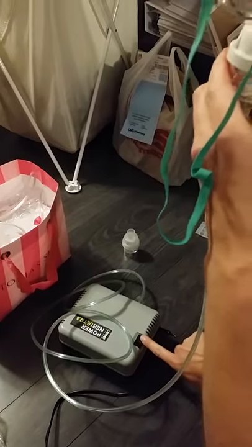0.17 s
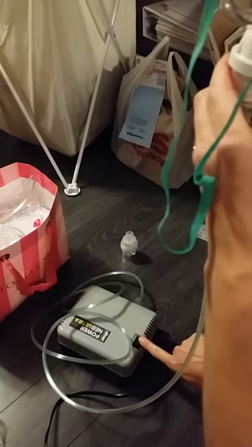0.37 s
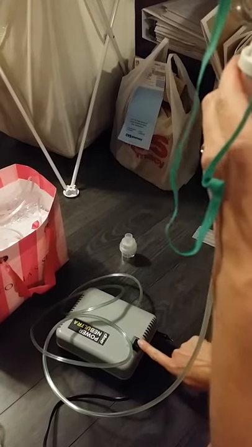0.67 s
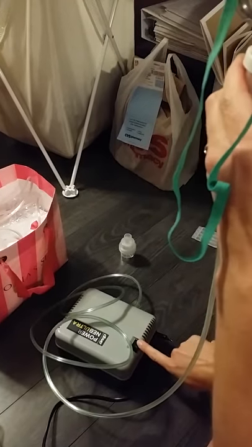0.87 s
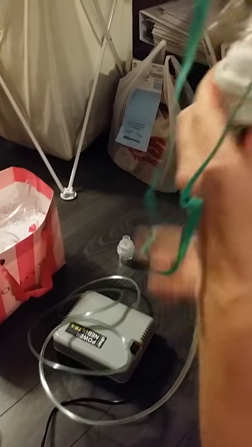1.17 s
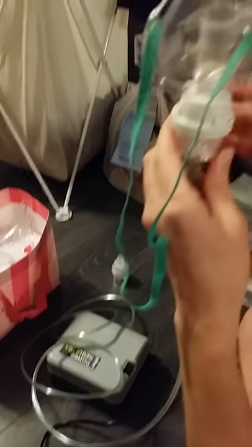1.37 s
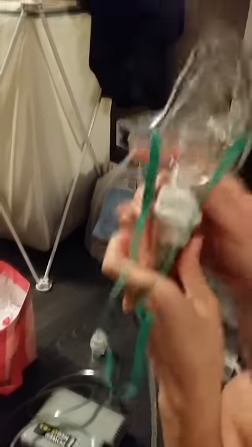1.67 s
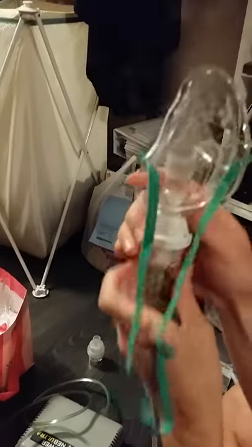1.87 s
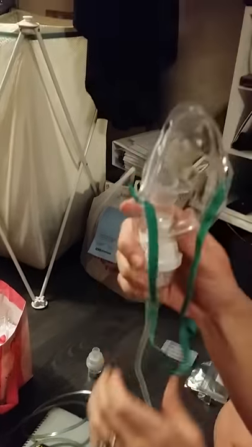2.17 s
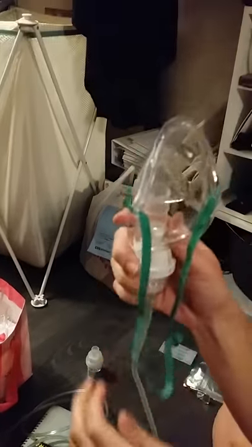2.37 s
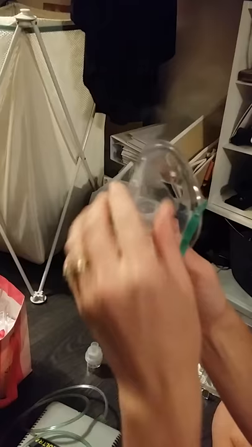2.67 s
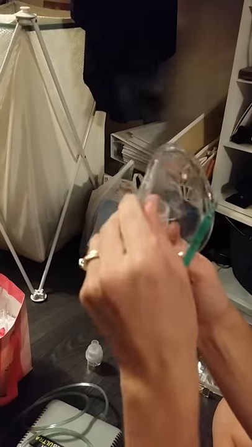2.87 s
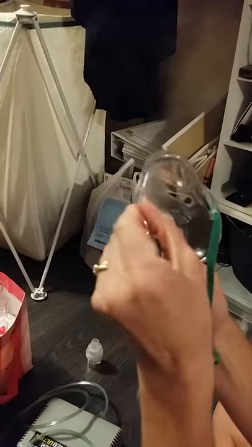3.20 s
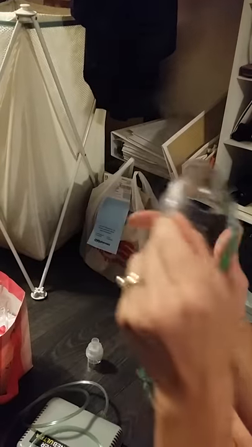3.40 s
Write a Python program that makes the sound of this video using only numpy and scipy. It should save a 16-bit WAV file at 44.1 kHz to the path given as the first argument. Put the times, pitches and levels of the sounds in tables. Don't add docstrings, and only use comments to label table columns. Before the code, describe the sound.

A small air compressor clicks on and buzzes steadily while its air jet hisses through a plastic mask.

```python
import sys
import numpy as np
from scipy import signal
from scipy.fft import rfft, irfft, next_fast_len
from scipy.io import wavfile
from scipy.ndimage import uniform_filter1d, map_coordinates

SR = 44100
rng = np.random.default_rng(int(sys.argv[2]) if len(sys.argv) > 2 else 0)


def volts_from_decibels(level):
    exponent = np.asarray(level, float) / 20
    return 10 ** exponent


def store_wav(level_fs):
    pcm = np.round(np.clip(np.atleast_2d(level_fs), -1, 1) * 32767)
    wavfile.write(sys.argv[1], SR, pcm.T.astype(np.int16))


N = 156114
T = np.arange(N) / SR


def unit(x):
    return x / np.sqrt(np.mean(np.abs(x) ** 2) + 1e-20)


def along(points, hz):
    f, v = np.transpose(points)
    return np.interp(np.log(hz + 1), np.log(f + 1), v)


def closed(points, hz):
    inside = (hz > points[0][0] * .9) * (hz < points[-1][0] * 1.05)
    return volts_from_decibels(along(points, hz)) * inside


def curves(rows, t):
    s, *cols = np.transpose(rows)
    return [np.interp(t, s, c) for c in cols]


def wobble(rate):
    knots = rng.standard_normal(int(N * rate / SR) + 4)
    return map_coordinates(knots, [np.arange(N) * rate / SR])


def filtered(x, response):
    m = next_fast_len(N + SR // 2)
    return irfft(rfft(x, m) * response(np.fft.rfftfreq(m, 1 / SR)), m)[..., :N]


# time_s, lag_samples
EAR_LAG = [(.25, 0), (.4, -5), (1.55, -5), (1.72, -20), (2.12, -20), (2.3, -10), (2.55, -10), (2.75, 5)]


def shaped(gain, alike, phase=0, patchy_db=6.0):
    hz, t, z = signal.stft(rng.standard_normal((3, N)), SR, nperseg=512)
    patches = rng.standard_normal(z[1:].shape)
    patches = uniform_filter1d(uniform_filter1d(patches, 5, 1), 10, 2)
    shared = np.clip(alike(hz[:, None]), 0, 1)
    lag = phase * hz[:, None] * curves(EAR_LAG, t)[0]
    turn = np.exp(.5j * np.multiply.outer([1, -1], lag))
    mix = np.sqrt(shared) * z[0] * turn + np.sqrt(1 - shared) * z[1:]
    mix = mix * gain(hz[:, None], t) * volts_from_decibels(patchy_db * unit(patches))
    return signal.istft(mix, nperseg=512)[1][:, :N]


def room():
    noise = shaped(lambda hz, t: (hz > 90) / np.sqrt(hz + 900), lambda hz: 0.076 + 0 * hz)
    return volts_from_decibels(-64) * unit(noise)


# time_s, peak_db
HAND_BUMPS = [
    (1.799, -58),
    (1.869, -58),
    (2.219, -64),
    (2.329, -65),
    (2.479, -58),
    (3.499, -57),
]


def hands():
    bump_s, bump_hz = .025, 52
    push = sum(volts_from_decibels(db + 2.5) * np.exp(-((T - s) / bump_s) ** 2) for s, db in HAND_BUMPS)
    push = push * np.sin(2 * np.pi * bump_hz * T)
    noise = rng.standard_normal((2, N))
    rumble = unit(filtered(noise, lambda hz: (hz > 35) / (1 + (hz / bump_hz) ** 4)))
    return push * volts_from_decibels([[1], [-1]]) + volts_from_decibels(-75 + 3.2 * wobble(7.9)) * rumble


# start_s, level_db, pitch_hz
PLASTIC_TAPS = [
    (1.035, -43, 2400),
    (2.188, -41, 2340),
    (2.362, -35.5, 2370),
]


def taps():
    t60_s, rise_s = 0.095, 0.00067
    total = np.zeros(N)
    for start, db, hz in PLASTIC_TAPS:
        since = np.clip(T - start, 0, None)
        envelope = volts_from_decibels(db - 60 * since / t60_s) * (1 - np.exp(-since / rise_s))
        total += envelope * np.sin(2 * np.pi * hz * since)
    return total * volts_from_decibels([[1.5], [-1.5]])


# frequency_hz, level_db (per Hz)
CLICK_SPECTRUM = [(900, -14), (1400, -26.5), (2400, -9.5), (5000, -14.5), (8500, -1.5), (14600, -24)]
# pitch_hz, level_db, t60_s
CASE_RING = [
    (262, -45, 0.1),
    (680, -47, 0.097),
    (837, -57, 0.62),
]


def switch():
    level_db, t60_s = -31, 0.19
    colour = lambda hz, t: closed(CLICK_SPECTRUM, hz) * volts_from_decibels([[[-2.5]], [[2.5]]])
    echo = unit(shaped(colour, lambda hz: .5 + 0 * hz, patchy_db=0.5))
    ring = sum(volts_from_decibels(db - 60 * T / t60) * np.sin(2 * np.pi * hz * T) for hz, db, t60 in CASE_RING)
    return volts_from_decibels(level_db - 60 * T / t60_s) * echo + ring


# time_s, rate_hz (strokes per second)
RUN_UP = [
    (.05, 22),
    (.137, 33),
    (.19, 45),
    (.215, 53.5),
    (.24, 54.6),
    (.3, 54.25),
]
RUNNING_HZ = 54.25
TURNS = np.cumsum(np.where(T < RUN_UP[-1][0], curves(RUN_UP, T)[0], RUNNING_HZ)) / SR

# time_s, jet_db, cup_db (over the jet), jet_pan_db, cup_pan_db (left over right)
MASK_TURNS = [(.05, -60, 13.5, 10, -13), (.17, -52, 5, 10.5, -6), (.34, -44, 8, 7, 6),
              (.4, -41, 4.5, 6, -5), (.75, -39.5, 4, 10.5, -6), (.95, -35.5, 5.5, 9, -2),
              (1.29, -29, 0, 9.5, -2.5), (1.63, -30, -2.5, 8.5, -5), (1.76, -30, 6, 5.5, -16.5),
              (1.9, -34, 8, -1, -14), (2.2, -34, 6.5, 0.5, -14), (2.36, -36, 2.5, 4, -11),
              (2.6, -34.5, 4.5, -3, -9), (2.7, -33.5, 3, 4.5, -18.5), (2.95, -31, 1, 3.5, -12.5),
              (3.1, -32.5, 4, 6, -11), (3.3, -31.5, 6, 2, -18), (3.4, -32, 4, 1, -12),
              (3.54, -31, 8, -1, -13)]
# time_s, pitch_hz
CUP_PITCH = [(.1, 8800), (1.6, 8645), (2.0, 8730), (3.5, 8590)]
# frequency_hz, level_db
JET_SPECTRUM = [(9300, -12), (10100, -2.5), (11300, -11), (12100, 3), (12550, -4.5), (13000, 0),
                (14250, -1), (14500, 2.5)]
# frequency_hz, level_db
NECK_SPECTRUM = [(3480, -21.5), (3740, -11), (4020, -21), (4400, -5.5), (5300, -7), (6500, -26.5),
                 (7200, -9.5), (7700, -15.5)]
# time_s, level_db
JET_FACING = [(.5, 2), (1.3, -1), (1.75, 0), (2.5, 2.5), (3.0, 2.5), (3.5, 3.5)]


def mask_gain(hz, t):
    jet_db, cup_db, jet_pan, cup_pan = curves(MASK_TURNS, t)
    neck_pan = 9.5
    aim = lambda db: volts_from_decibels(np.multiply.outer([.5, -.5], db + 0 * t))[:, None]
    bell = lambda centre, width: np.exp(-((hz - centre) / width) ** 2)
    off = hz - curves(CUP_PITCH, t)[0]
    cup = 1 / (1 + (2 * off / 150) ** 2) + volts_from_decibels(2 * -25) * np.exp(-(off / 900) ** 2)
    cup = np.sqrt(cup) * np.exp(-(off / 1800) ** 4) * volts_from_decibels(cup_db + 15.5) * aim(cup_pan)
    neck = closed(NECK_SPECTRUM, hz) * volts_from_decibels(-3 + 14.5 + 0.61 * cup_db)
    neck = neck * aim(neck_pan + 0.33 * cup_pan)
    sweep_s, sweep_long_s = 1.17, 0.32
    sweep_hz = 12450 + 1500 * (t - sweep_s)
    sweep_db = 6.5 * np.exp(-((t - sweep_s) / sweep_long_s) ** 2 - ((hz - sweep_hz) / 500) ** 2)
    jet = closed(JET_SPECTRUM, hz) * volts_from_decibels(10.5 + curves(JET_FACING, t)[0] + sweep_db) * aim(jet_pan)
    collar = volts_from_decibels(6 + 0.4 * curves(EAR_LAG, t)[0]) * bell(5508, 213) * aim(neck_pan)
    pipe = volts_from_decibels(11) * bell(4668, 160) * aim(neck_pan - 3.5)
    return volts_from_decibels(jet_db) * np.sqrt(pipe ** 2 + collar ** 2 + cup ** 2 + neck ** 2 + jet ** 2)


def mask():
    hiss = shaped(mask_gain, lambda hz: .82 + 0 * hz, phase=-2 * np.pi / SR, patchy_db=2.0)
    pulse = 1 + 0.034 * np.cos(2 * np.pi * (TURNS - .4))
    return hiss * pulse * volts_from_decibels(0.33 * wobble(20)) * np.clip(T / 0.11, 0, 1)


def strokes():
    jitter_s, scatter_db = .00003, .6
    k = np.arange(1, int(TURNS[-1]))
    draw = rng.standard_normal((len(k), 2))
    at = (np.interp(k, TURNS, T) + jitter_s * draw[:, 0]) * SR
    near = np.floor(at)[:, None] + np.arange(-7, 9)
    force = np.sinc(near - at[:, None]) * volts_from_decibels(scatter_db * draw[:, 1:])
    return np.bincount(near.astype(int).ravel(), force.ravel(), N)[:N]


# order (stroke multiple), level_db, pan_db (left over right)
FIRST_HARMONICS = [(1.0, -9.0, 1.0), (2.0, -8.0, -1.0), (3.0, -20.0, -0.0), (4.0, 0.0, -1.0),
                   (5.0, -6.0, -1.0), (6.0, -11.0, 2.0), (7.0, -20.0, -14.0), (8.0, -22.0, -5.0),
                   (9.0, -6.0, 7.0), (10.0, -9.0, 2.0), (11.0, -1.0, -1.0), (12.0, -4.0, -5.0),
                   (13.0, -1.0, 1.0), (14.0, -6.0, 10.0), (15.0, -22.0, -4.0), (16.0, -12.0, 6.0),
                   (17.0, -19.0, -14.0), (18.0, -8.0, -4.0), (19.0, -9.0, 3.0), (20.0, -7.0, -0.0),
                   (21.0, -11.0, -4.0), (22.0, -11.0, -6.0), (23.0, -16.0, -10.0), (24.0, -21.0, -6.0),
                   (25.0, -15.0, 3.0), (26.0, -21.0, -1.0), (27.0, -15.0, -8.0), (28.0, -20.0, -14.0),
                   (29.0, -26.0, 3.0), (30.0, -16.0, -1.0)]
# order (stroke multiple), level_db, pan_db (left over right)
SECOND_HARMONICS = [(1.0, -42.0, 5.0), (2.0, -19.0, -1.0), (3.0, -23.0, -3.0), (4.0, -11.0, -2.0),
                    (5.0, -14.0, -0.0), (6.0, -18.0, 2.0), (7.0, -22.0, -7.0), (8.0, -35.0, -14.0),
                    (9.0, -16.0, 4.0), (10.0, -14.0, -3.0), (11.0, -5.0, -2.0), (12.0, 0.0, 0.0),
                    (13.0, -13.0, -0.0), (14.0, -12.0, 5.0), (15.0, -27.0, -11.0), (16.0, -13.0, -4.0),
                    (17.0, -20.0, -9.0), (18.0, -13.0, -4.0), (19.0, -16.0, 4.0), (20.0, -12.0, -5.0),
                    (21.0, -19.0, -9.0), (22.0, -16.0, -5.0), (23.0, -18.0, -5.0), (24.0, -25.0, 1.0),
                    (25.0, -29.0, -11.0), (26.0, -26.0, -5.0), (27.0, -23.0, -5.0), (28.0, -22.0, -14.0),
                    (29.0, -28.0, 7.0), (30.0, -39.0, -7.0), (31.0, -27.0, -13.0), (32.0, -40.0, -8.0),
                    (33.0, -27.0, -14.0), (34.0, -28.0, -5.0), (35.0, -28.0, -14.0), (36.0, -24.0, -11.0),
                    (37.0, -44.0, 0.0), (38.0, -30.0, -12.0), (39.0, -30.0, 1.0), (40.0, -30.0, -4.0),
                    (41.0, -28.0, -9.0), (42.0, -30.0, -8.0), (43.0, -38.0, -4.0), (44.0, -36.0, 8.0),
                    (45.0, -30.0, -7.0), (46.0, -31.0, -0.0), (47.0, -26.0, -3.0), (48.0, -44.0, 0.0),
                    (49.0, -23.0, -4.0), (50.0, -24.0, -6.0), (51.0, -27.0, -11.0), (52.0, -32.0, -9.0),
                    (53.0, -32.0, 2.0), (54.0, -35.0, -4.0)]
# frequency_hz, phase_rad
EAR_PHASE = [(100, 0), (270, -.1), (325, -.6), (490, .2), (650, -1.05), (760, -.8), (900, -1.7),
             (2410, -1.5)]
# frequency_hz, spread_rad
WALL_SCATTER = [(100, -.6), (400, -.9), (500, -.45), (780, -.45), (900, 1.6), (3000, 2.2)]


def knock(blows, share):
    late_s = .0028
    walls = rng.standard_normal(SR // 100)

    def path(orders, hz):
        colour = np.array([closed([(o * RUNNING_HZ, db + ear * pan) for o, db, pan in orders], hz)
                           for ear in (.5, -.5)])
        scatter = along(WALL_SCATTER, hz) * map_coordinates(walls, [hz / 60])
        smear = np.exp(1j * scatter - 2j * np.pi * hz * late_s)
        return colour * smear * np.exp(np.multiply.outer([1, -1], .5j * along(EAR_PHASE, hz)))

    first = unit(filtered(blows, lambda hz: path(FIRST_HARMONICS, hz))) * volts_from_decibels(-4 + 1.5)
    second = unit(filtered(blows, lambda hz: path(SECOND_HARMONICS, hz)))
    moving = volts_from_decibels(4 * share * (1 - share) * wobble(30))
    return ((1 - share) * first + share * second) * moving


# frequency_hz, level_db (per Hz)
VALVE_SPECTRUM = [(60, -19), (216, -9), (420, -21.5), (650, -1), (830, -15), (1070, -13), (2900, -13.5),
                  (3250, -30)]
# frequency_hz, coherence (0-1)
VALVE_ALIKE = [(60, 0.3), (500, 0.77), (1500, 0), (3000, .2)]


def valve_air():
    gate = 1 + 0.058 * np.cos(2 * np.pi * (TURNS - 0.48))
    air = shaped(lambda hz, t: closed(VALVE_SPECTRUM, hz), lambda hz: along(VALVE_ALIKE, hz), patchy_db=2.15)
    return unit(gate * air)


# pitch_hz, time_s, level_db
RUN_UP_MODES = [
    (597, .13, -44.5),
    (527, 0.227, -44.5),
    (710, .28, -51.5),
]


def shudder(blows):
    total = np.zeros(N)
    for c, s, db in RUN_UP_MODES:
        mode = filtered(blows, lambda hz: 1j * hz / (c * c - hz * hz + 1j * hz * 25))
        mode = np.resize(unit(mode[:SR // 3]), N)
        total += volts_from_decibels(db) * np.exp(-((T - s) / .05) ** 2) * mode
    return total


# time_s, level_db
PUMP_LEVEL = [(.05, -50), (.1, -52), (.16, -45.5), (.24, -40), (.32, -40.5), (.7, -43), (.95, -36.5),
              (1.3, -34), (1.65, -35), (1.8, -32.5), (2.2, -33.5), (3.05, -32), (3.3, -30), (3.42, -31.5),
              (3.54, -27)]
# time_s, share (of the second place, 0-1)
PHONE_SHIFT = [
    (.85, 0),
    (1.2, .3),
    (1.28, .9),
    (1.6, 1),
]


def pump():
    blows = strokes()
    share = np.clip(curves(PHONE_SHIFT, T)[0], 0, 1)
    buzz = knock(blows, share) * volts_from_decibels(.8 * wobble(5.51))
    air = volts_from_decibels(-10 + 1.5 * (3 - share)) * valve_air()
    return shudder(blows) + volts_from_decibels(curves(PUMP_LEVEL, T)[0]) * (buzz + air)


def scene():
    buzz = pump()
    cut = np.clip((T - 1.09) / .03, 0, 1)
    buzz = buzz - cut * filtered(buzz, lambda hz: hz < 75)
    return room() + hands() + taps() + switch() + mask() + buzz


# frequency_hz, left_db, right_db
STEP_SIZE = [(1100, -30, -30), (1800, -5, -14), (2500, -7, -8), (3300, 1, 3), (4600, -5, -1), (6300, 1, 4),
             (7600, -5, -8), (14000, -14, -14)]
# time_s, left_db, right_db
STEP_EASE = [(.12, 7, 3), (.3, -1, 1), (1.05, 5, 4), (1.15, -3, -2), (1.55, 0, 1), (1.7, -2, 2),
             (2.65, -2, 0), (3.2, 4, 3)]


def thrifty(x, size=1024):
    n, k = np.arange(2 * size), np.arange(size)
    window = np.sin(np.pi * (n + .5) / (2 * size))[:, None]
    basis = window * np.cos(np.pi / size * np.outer(n + .5 + size / 2, k + .5)) * np.sqrt(2 / size)
    blocks = np.pad(x, ((0, 0), (size, 2 * size - N % size))).reshape(2, -1, size)
    lines = np.concatenate([blocks[:, :-1], blocks[:, 1:]], axis=2) @ basis
    hz = (k + .5) * SR / (2 * size)
    t = np.arange(lines.shape[1]) * size / SR
    nearby = uniform_filter1d(uniform_filter1d(lines ** 2, 150, axis=2), size=3, axis=1)
    luck = np.repeat(rng.standard_normal(lines.shape[:2] + (size // 8,)), 8, axis=2)
    ease = np.multiply.outer(curves(STEP_EASE, t), hz < 4300)
    ease = ease - 20 * (t < .07)[:, None] - 6 * np.outer(t < .33, hz > 4300)
    step_db = np.array(curves(STEP_SIZE, hz))[:, None] + ease + 1.5 * luck
    step = np.sqrt(np.abs(nearby) + 1e-16) * volts_from_decibels(step_db)
    rounded = np.sign(lines) * np.floor(np.abs(lines) / step + .4) * step
    back = rounded @ basis.T
    return (back[:, 1:, :size] + back[:, :-1, size:]).reshape(2, -1)[:, :N]


def low_pass(x):
    return signal.sosfilt(signal.butter(12, 15380, fs=SR, output="sos"), x)


def record(dry):
    mix = filtered(thrifty(dry), lambda hz: hz < 14540)
    return low_pass(mix)


dry = scene()
out = record(dry)
store_wav(out)
```